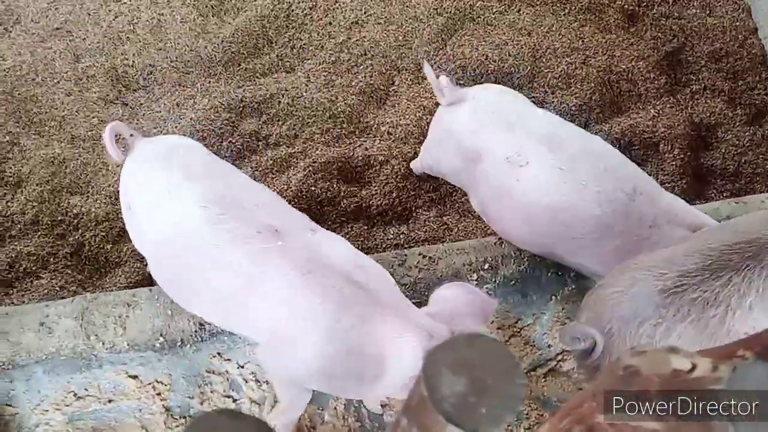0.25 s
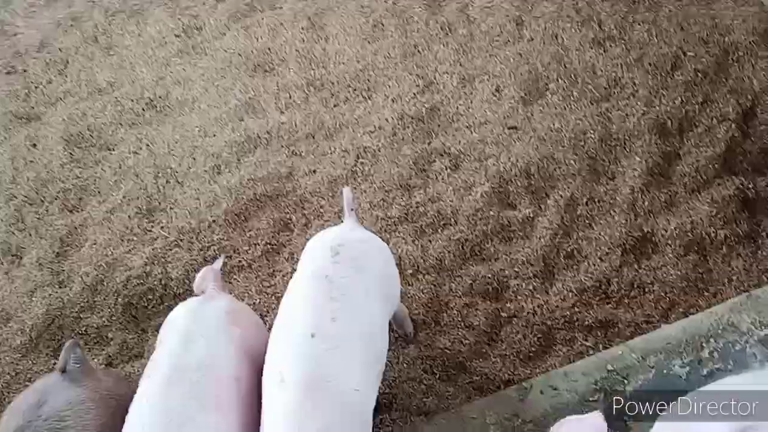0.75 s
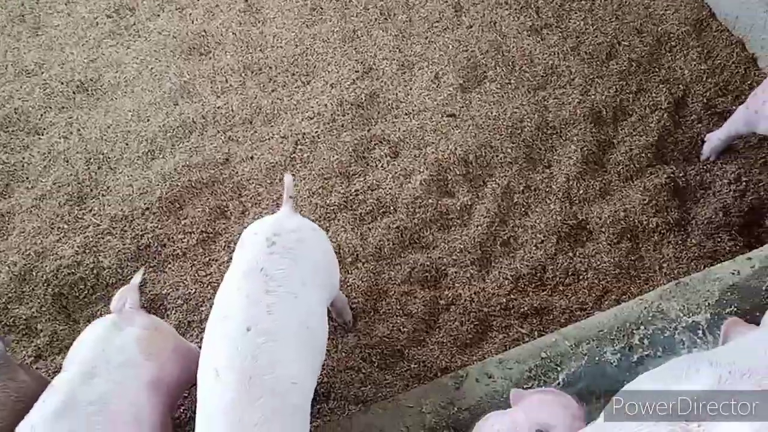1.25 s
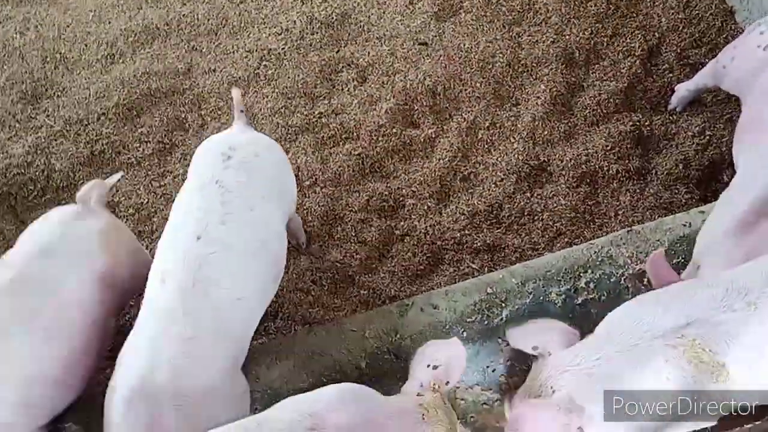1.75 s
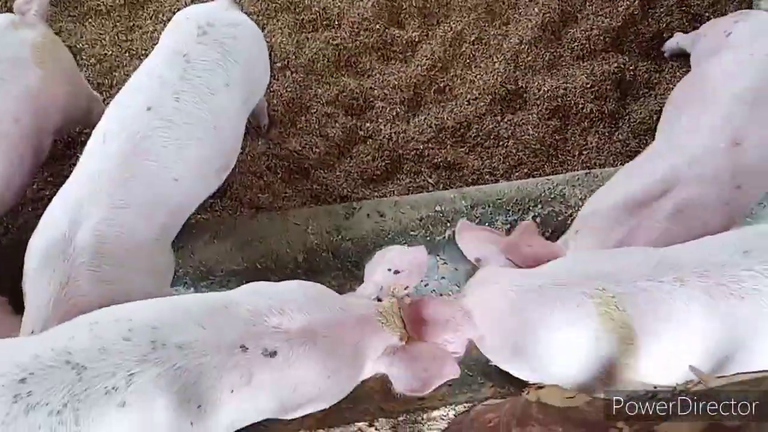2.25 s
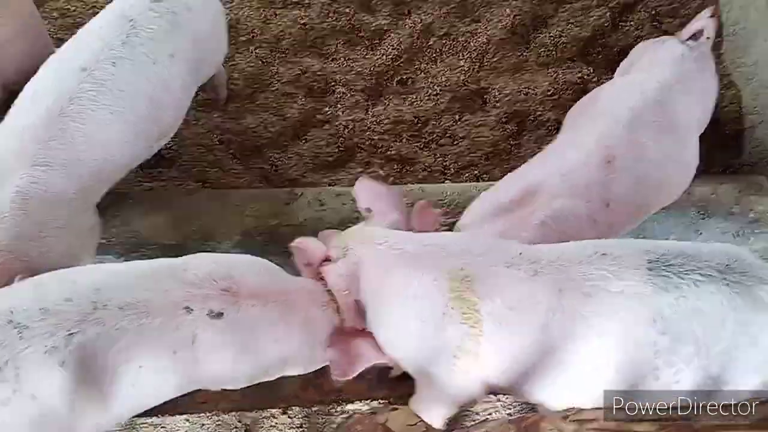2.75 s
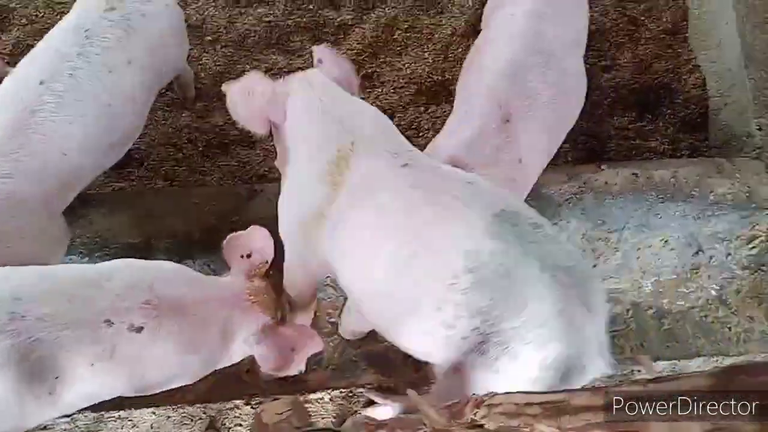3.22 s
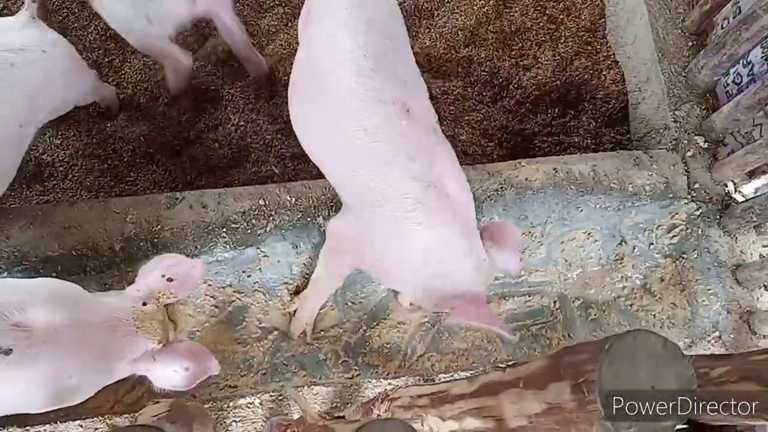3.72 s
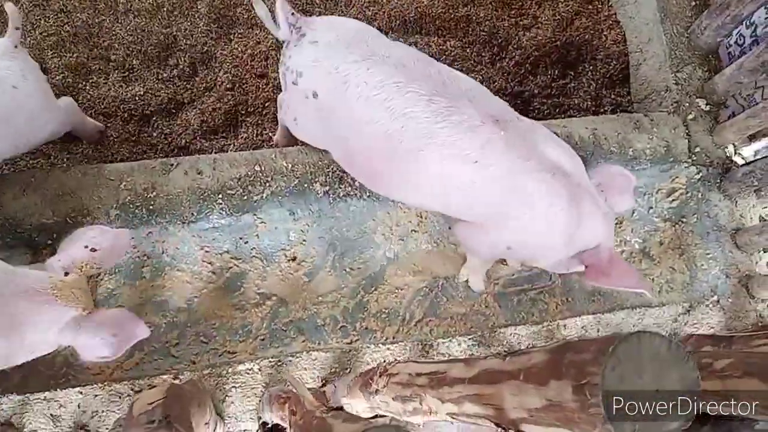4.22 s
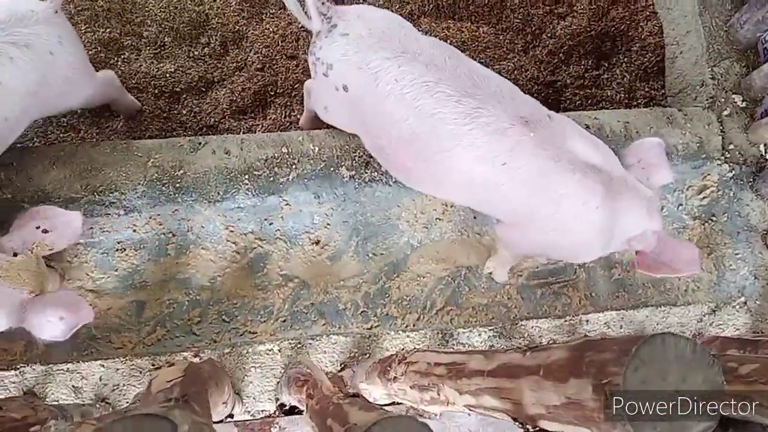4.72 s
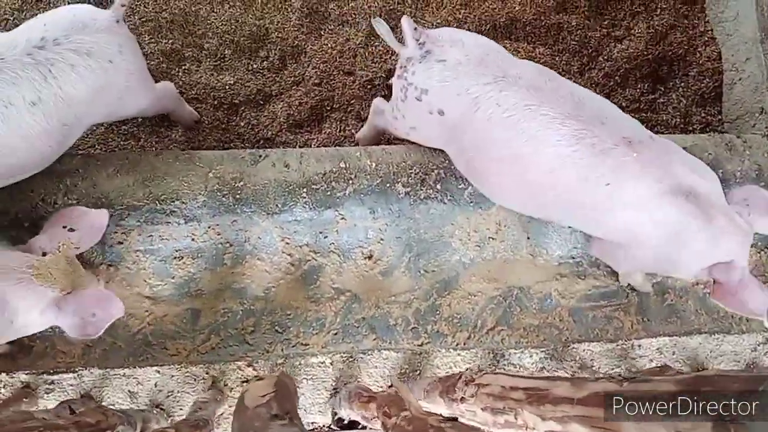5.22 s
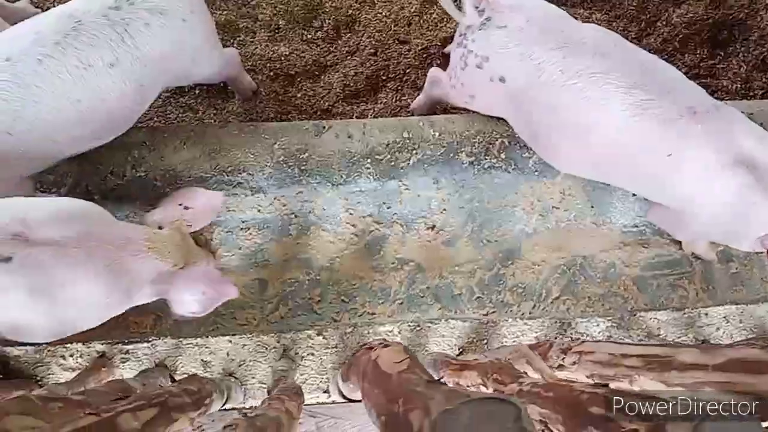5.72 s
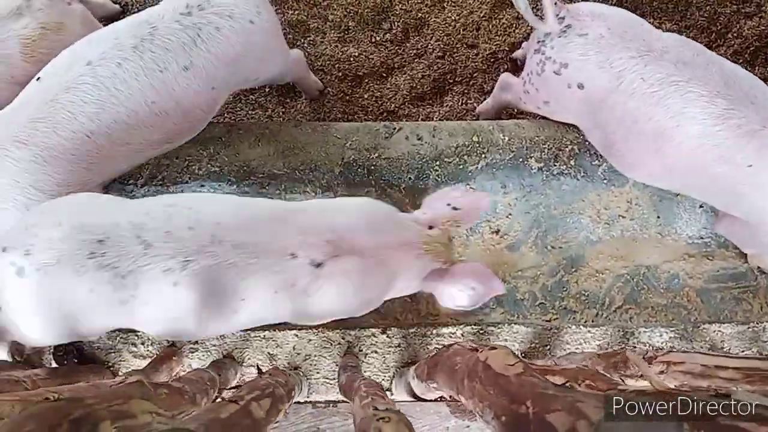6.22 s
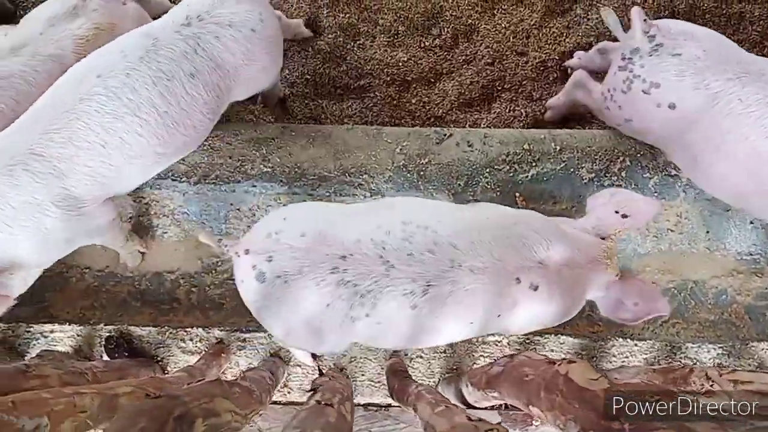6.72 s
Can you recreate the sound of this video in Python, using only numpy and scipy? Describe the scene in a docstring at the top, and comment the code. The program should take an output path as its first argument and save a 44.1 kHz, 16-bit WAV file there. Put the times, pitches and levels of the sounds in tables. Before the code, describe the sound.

Dense, messy pig chewing fills the whole stretch: sharp lip smacks, juicy slurps, crackling spit and low gulps, arriving irregularly from several mouths. The gulping thins briefly, then gathers again in the middle, while soft foot and snout thuds continue underneath. The sound is close, bright and mono, with tight reflections from a concrete pen; a tiny trio of bird chirps passes late.

```python
"""Piglets eat wet feed from a concrete trough, heard close from above through a mono phone microphone.
Lips and tongues smack, slurp and spit: noise bursts ring in mouth resonances. Throats gulp: sliding sine
notes with rasp. The herd's chewing is grainy noise, pops and ticks in flickering bands that swell and fade.
Thuds knock through the trough over a low, uneven rumble and a faint steady hiss; a bird gives three quick
chirps."""
import sys
import numpy as np
from scipy import signal
from scipy.fft import rfft, irfft, next_fast_len
from scipy.io import wavfile
from scipy.ndimage import uniform_filter1d

SR = 44100
rng = np.random.default_rng(int(sys.argv[2]) if len(sys.argv) > 2 else 0)


def materialize(psi):
    """Save the field psi as 16-bit PCM at rate SR to the path in sys.argv[1].

    A 1-D psi becomes a single channel; in a 2-D psi each row is a channel.
    """
    bounded = np.clip(np.atleast_2d(psi).T, -1, 1)
    quanta = np.round(bounded * 32767).astype(np.int16)
    wavfile.write(sys.argv[1], SR, quanta)


N = 307377

# herd's chewing, levels before flicker: t/s, grinding level/dB, mashing level/dB, squelch level/dB
CHEWING = [(0.0, -41, -48, -73), (0.09, -45, -51.5, -68), (0.14, -38, -54, -61), (0.25, -51.5, -48.5, -58),
           (0.34, -46.5, -59.5, -74), (0.41, -47, -47, -71), (0.5, -51.5, -56.5, -78),
           (0.63, -45.5, -50, -61), (0.67, -46.5, -63, -81), (0.74, -45, -47, -69), (0.81, -43.5, -61, -66),
           (0.88, -50.5, -55.5, -63.5), (0.97, -41, -49.5, -75), (1.03, -47.5, -64, -78.0),
           (1.08, -43.5, -52, -71), (1.13, -49, -62.5, -76), (1.29, -41, -46.5, -59), (1.37, -51, -58, -75),
           (1.53, -51, -53.5, -74.0), (1.59, -41, -52.5, -65), (1.71, -45.5, -58, -80),
           (1.75, -43, -60, -79), (1.79, -46.5, -54.5, -64), (1.89, -44, -56, -63), (1.96, -47, -49, -75),
           (2.01, -52.5, -67, -83), (2.07, -46, -55.5, -75), (2.14, -48, -54, -66),
           (2.27, -39.5, -54.5, -63.5), (2.5, -52, -54, -73), (2.56, -53.5, -70, -79.0),
           (2.62, -48.5, -56, -67), (2.74, -49.5, -59, -77), (2.83, -42, -46, -61),
           (2.89, -50.5, -57.5, -73), (2.97, -42.5, -52.5, -77), (3.15, -48, -51, -57),
           (3.22, -44.5, -58.0, -64), (3.35, -46, -50.5, -74), (3.46, -44, -55, -70),
           (3.67, -47.5, -51.5, -71), (3.77, -50.5, -59, -70), (3.84, -53.5, -57, -59),
           (3.89, -43, -55.5, -75), (4.01, -43, -54, -54), (4.11, -46, -54, -90), (4.19, -42.5, -48.5, -65),
           (4.3, -52, -62.5, -76), (4.39, -45.5, -54.5, -70), (4.44, -44.5, -53, -52),
           (4.56, -48, -59, -81), (4.6, -43.5, -46.5, -62), (4.65, -42.0, -53, -49.5),
           (4.83, -43.5, -51.5, -70.5), (5.01, -49.5, -58.5, -78), (5.14, -48.5, -54.5, -75),
           (5.2, -51.5, -55, -72), (5.36, -46.5, -53.5, -71), (5.42, -48, -54, -80),
           (5.62, -44.5, -51, -64), (5.92, -53, -59, -82), (6.0, -48.5, -52, -70.0), (6.1, -52, -64, -77),
           (6.15, -49.5, -54, -82), (6.24, -55, -67, -78.0), (6.31, -48.5, -47, -72),
           (6.38, -50.5, -65, -83), (6.56, -43.5, -49.5, -62.5), (6.63, -49, -52.5, -81),
           (6.77, -47, -53, -69), (6.84, -49.5, -52, -79), (6.97, -43.5, -54, -78.0)]
FIZZ_FROM_HZ = 7000


def undb(db):
    """Amplitude factor of a level in dB."""
    return 10 ** (np.asarray(db) / 20)


def unit(x):
    """Scale to RMS 1."""
    return x / np.sqrt(np.mean(x ** 2))


def band(x, hz, width_oct, order=1):
    """Butterworth band-pass around hz, edges kept between 20 Hz and 0.45 SR."""
    edges_hz = np.clip(hz * 2 ** (np.array([-.5, .5]) * width_oct), 20, .45 * SR)
    return signal.sosfilt(signal.butter(order, edges_hz, "bandpass", fs=SR, output="sos"), x)


def walk(rate_hz):
    """Random levels held 1 / rate_hz s, smoothed by two moving averages; RMS 1."""
    hold = int(SR / rate_hz)
    steps = np.repeat(rng.standard_normal(N // hold + 1), hold)
    return unit(uniform_filter1d(uniform_filter1d(steps, hold), hold)[:N])


def crackle(n, spread_db, grain_s):
    """Noise whose strength jumps from grain to grain, as wet films tear."""
    grain = max(int(grain_s * SR), 1)
    grain_db = spread_db * np.repeat(rng.standard_normal(n // grain + 1), grain)[:n]
    return rng.standard_normal(n) * undb(grain_db)


def fade(n, rise_s, t60_s):
    """Smooth rise times an exponential fall of 60 dB in t60_s (10 ms at least)."""
    t = np.arange(n) / SR
    return (1 - np.exp(-(t / rise_s) ** 2)) * np.exp(-np.log(1000) * t / max(t60_s, .01))


def add(out, start_s, sound, peak_db):
    """Mix a sound in at start_s, scaled to the given peak."""
    i = max(int(start_s * SR), 0)
    sound = sound[:N - i]
    out[i:i + len(sound)] += sound * undb(peak_db) / np.max(np.abs(sound))


def curves(table, t):
    """Each column of a curve table, interpolated at times t."""
    s, *columns = np.transpose(table)
    return [np.interp(t, s, c) for c in columns]


def scatter(per_s, column, re_db, spread_db, low_hz, octaves, t60_s):
    """Faint events at chance moments, louder where the chewing is: rows of t/s, peak/dB, f/Hz, t60/s."""
    when, size, pitch = rng.random((int(per_s * N / SR), 3)).T
    when_s = when * N / SR
    peak_db = curves(CHEWING, when_s)[column] + re_db - spread_db * np.log(size + 0.18)
    return [(s, db, low_hz * 2 ** (octaves * p), t60_s) for s, db, p in zip(when_s, peak_db, pitch)]


def coloured(points, flicker_db, rate_hz, noise):
    """Weight noise by f/Hz, level/dB points; cut third-octave bands, each flickering alone: (Hz, band) pairs."""
    treble_calm = 0.55  # share of the flicker kept by the fizz bands
    hz, db = np.transpose(points)
    size = next_fast_len(N)
    f = np.fft.rfftfreq(size, 1 / SR) + 1  # 1 Hz up, clear of log(0)
    spectrum = rfft(noise, size) * undb(np.interp(np.log(f), np.log(hz), db))
    bands = []
    for centre in hz[0] * 2 ** np.arange(0, np.log2(hz[-1] / hz[0]) + 1 / 3, 1 / 3):
        shape = np.cos(np.pi / 2 * np.clip(3 * np.log2(f / centre), -1, 1)) ** 2
        share = treble_calm if centre > FIZZ_FROM_HZ else 1
        flicker = undb(flicker_db * walk(rate_hz) * share)
        bands.append((centre, irfft(spectrum * shape, size)[:N] * flicker))
    return bands


def background_hiss():
    """A faint, steady mid-band background hiss, present throughout: band-passed noise."""
    return unit(band(rng.standard_normal(N), 1000, 1.9, order=2)) * undb(-78)


def rumble():
    """Shuffling bodies and far-off farm noise: low coloured noise in quick bumps."""
    # rumble spectrum: f/Hz, relative density/dB
    rumble_points = [(12, -50), (20, -11), (43, -25.5), (99, -7), (129, -1), (214, -7.5), (296, -19.5),
                     (400, -10), (520, -19), (880, -120)]
    bands = coloured(rumble_points, flicker_db=2.0, rate_hz=8, noise=rng.standard_normal(N))
    return unit(sum(b for hz, b in bands)) * undb(-68.5 + 3.9 * walk(25))


def bird():
    """A small bird some way off: each chirp is a pure tone sliding down about a fifth of its pitch."""
    # chirps: t/s, peak/dB
    chirp_rows = [(6.33, -41), (6.355, -36), (6.38, -38)]
    start_hz = 7550
    out, t = np.zeros(N), np.arange(int(.013 * SR)) / SR
    for s, db in chirp_rows:
        tone = np.sin(2 * np.pi * start_hz * (t - 7.9 * t ** 2))
        add(out, s, tone * np.hanning(len(t)), db)
    return out


def thuds():
    """Feet and snouts on the trough: dull, short noise knocks carried through concrete and rails."""
    # thuds, begun 8 ms ahead: t/s, peak/dB
    thud_rows = [(0.269, -54), (0.416, -60), (0.736, -51), (0.879, -56), (1.041, -57), (1.215, -49),
                 (1.276, -56), (1.436, -56), (1.511, -53), (1.661, -59), (1.834, -59), (1.918, -51),
                 (2.138, -51), (2.219, -48.5), (2.399, -53), (2.527, -54), (2.617, -52), (2.702, -52),
                 (2.913, -50), (2.988, -54), (3.084, -54), (3.302, -54), (3.578, -51), (3.853, -48),
                 (3.98, -47.5), (4.163, -50), (4.419, -48), (4.569, -53), (4.868, -68), (5.197, -70),
                 (5.368, -53), (5.636, -63), (5.762, -57), (5.957, -52), (6.071, -60), (6.364, -55),
                 (6.453, -57), (6.539, -51.5), (6.66, -51), (6.753, -60), (6.855, -50)]
    centre_hz, scatter_share = 115.3, 0.072
    out, n = np.zeros(N), int(.25 * SR)
    for s, db in thud_rows:
        push = rng.standard_normal(n) * fade(n, 0.008, 0.11)
        hz = centre_hz * (1 + scatter_share * rng.standard_normal())
        knock = band(push, hz, 0.54, order=2) + 0.25 * band(push, 86, 0.76, order=2)
        add(out, s - .008, knock, db)
    return out


def pops(rate_per_s, spread_db, t60_s):
    """Tiny air pockets bursting in the mash, each a short ring at its own pitch."""
    slots_per_s, n = 2000, 1024
    out = np.zeros(N + n)
    t = np.arange(n) / SR
    for slot, (keep, pitch, size) in enumerate(rng.random((N * slots_per_s // SR, 3))):
        if keep < rate_per_s / slots_per_s:
            hz = 1000 + 14500 * pitch ** 1.6
            ring = np.sin(2 * np.pi * hz * t) * fade(n, 0.00046, t60_s)
            i = slot * SR // slots_per_s
            out[i:i + n] += ring * undb(-spread_db * np.log(size + .03))
    return unit(out[:N])


def ticks(rate_per_s, spread_db, t60_s):
    """Wet films snapping: sparse clicks, each a very short wideband noise tail."""
    keep, size = rng.random((N, 2)).T
    snaps = (keep < rate_per_s / SR) * undb(-spread_db * np.log(size + .1))
    return unit(signal.fftconvolve(snaps, fade(512, 0.00017, t60_s))[:N] * rng.standard_normal(N))


def herd():
    """Many jaws at once: grinding, mashing, squelch, fizz and throat murmur swell bite by bite."""
    # chewing spectrum: f/Hz, relative density/dB
    chew_points = [(650, -63), (1100, -29), (1240, -48), (1550, -15), (1900, -2.5), (2530, -0.5),
                   (3230, -1.5), (4600, 3.5), (7420, -1.5), (8660, 5.5), (9680, 2), (11700, -9),
                   (14600, -8.5), (15600, -11)]
    # murmur and squelch spectrum: f/Hz, relative density/dB
    murmur_points = [(180, -55), (300, -58), (470, -6), (648, -17.5), (751, -5), (1070, -12), (1220, -15),
                     (1400, -8.5), (1600, -38), (2080, -23), (3520, -120)]
    # wet fizz, by band centre: t/s, 7-9.1 kHz level/dB, 9.1-11.5 kHz level/dB, level above/dB
    fizz_rows = [(0.0, -44.5, -50, -54), (0.41, -48, -53.5, -53), (0.56, -48, -55, -52),
                 (0.76, -46, -54.5, -51), (1.12, -53, -47.5, -48.5), (1.4, -51, -55, -49.5),
                 (1.57, -50, -48, -49), (1.71, -50.5, -51.5, -49), (2.74, -49.5, -50, -51.5),
                 (3.14, -48, -48, -49), (3.94, -48.5, -47.5, -49), (4.1, -46, -41.5, -43.5),
                 (4.39, -48.5, -48, -47), (4.72, -47, -45.5, -48.5), (5.05, -48, -51, -51.5),
                 (5.49, -49, -51, -51), (5.9, -48, -52, -50.5), (6.19, -47.5, -52, -50),
                 (6.5, -49.5, -51, -50.5), (6.97, -46.5, -44, -47.5)]
    # throat murmur: t/s, level/dB
    throat_rows = [(0.0, -66), (0.09, -56), (0.15, -58), (0.27, -67), (0.35, -81), (0.43, -87), (0.64, -74),
                   (0.79, -61.5), (0.99, -72), (1.16, -77), (1.3, -59), (1.44, -82), (1.65, -59),
                   (1.76, -82), (1.8, -65), (1.94, -77), (2.33, -71), (2.39, -87), (2.52, -62.5),
                   (2.58, -72), (2.72, -71), (2.81, -55), (2.93, -67), (3.11, -71), (3.22, -55),
                   (3.42, -70), (3.63, -65), (3.76, -74), (3.9, -70), (4.04, -61), (4.12, -64), (4.25, -76),
                   (4.41, -65), (4.44, -73), (4.56, -69), (4.6, -54.5), (4.76, -72), (4.85, -58),
                   (4.99, -70.5), (5.16, -75), (5.38, -67), (5.47, -65), (5.82, -77), (6.56, -70.5),
                   (6.97, -64.5)]
    squelch_from_hz, grind_from_hz, upper_from_hz, top_from_hz = 620, 3000, 9100, 11500

    t = np.arange(N) / SR
    grind_db, mash_db, squelch_db = curves(CHEWING, t)
    fizz_db, upper_db, top_db = curves(fizz_rows, t)
    murmur_db, = curves(throat_rows, t)

    mush = crackle(N, spread_db=1.5, grain_s=0.0099)
    mush = mush + undb(-7.5) * pops(rate_per_s=1200, spread_db=5.0, t60_s=0.024)
    mush = mush + undb(-8.5) * ticks(rate_per_s=110, spread_db=3.5, t60_s=0.007)
    bands = coloured(chew_points, flicker_db=2.0, rate_hz=30, noise=mush)

    # wider-open mouths let the sound reach lower: the lowest bands swell most
    opening_db = 0.7 * (mash_db - mash_db.mean()) + 3.6 * walk(14)  # per octave below grind_from_hz
    mash = unit(sum(b * undb(opening_db * np.log2(grind_from_hz / hz))
                    for hz, b in bands if hz < grind_from_hz))
    grind = unit(sum(b for hz, b in bands if grind_from_hz <= hz < FIZZ_FROM_HZ))
    fizz = unit(sum(b for hz, b in bands if FIZZ_FROM_HZ <= hz < upper_from_hz))
    upper = unit(sum(b for hz, b in bands if upper_from_hz <= hz < top_from_hz))
    top = unit(sum(b for hz, b in bands if hz >= top_from_hz))

    throat_noise = crackle(N, spread_db=3.0, grain_s=0.0059)
    low = coloured(murmur_points, flicker_db=7.0, rate_hz=35, noise=throat_noise)
    murmur = unit(sum(b for hz, b in low if hz < squelch_from_hz))
    squelch = unit(sum(b for hz, b in low if hz >= squelch_from_hz))

    teeth = (mash * undb(mash_db) + grind * undb(grind_db)) * undb(1.0 * walk(25))
    hiss = fizz * undb(fizz_db) + upper * undb(upper_db) + top * undb(top_db)
    return teeth + hiss + murmur * undb(murmur_db) + squelch * undb(squelch_db)


def gulps():
    """A pocket of air in the throat: a soft push and a little noise ring one hollow, sliding note."""
    # gulps, begun 5 ms ahead: t/s, peak/dB, throat note f/Hz, t60/s
    gulp_rows = [(0.059, -37.5, 508, 0.099), (0.134, -44.5, 534, 0.076), (0.215, -47, 550, 0.09),
                 (0.24, -37, 494, 0.18), (0.273, -38, 477, 0.024), (0.393, -48, 492, 0.17),
                 (1.245, -42.5, 464, 0.13), (1.291, -43, 442, 0.057), (1.392, -49.5, 466, 0.11),
                 (1.458, -52, 597, 0.057), (1.524, -33, 458, 0.033), (1.558, -43, 526, 0.069),
                 (1.612, -44.5, 576, 0.12), (1.734, -55, 590, 0.04), (1.795, -55, 513, 0.1),
                 (1.815, -44.5, 486, 0.11), (1.845, -50.5, 557, 0.12), (2.225, -51, 474, 0.12),
                 (2.32, -53, 642, 0.12), (2.36, -54, 630, 0.078), (1.873, -46.5, 591, 0.15),
                 (1.913, -44, 454, 0.063), (1.964, -45, 554, 0.09), (1.983, -43, 484, 0.11),
                 (2.168, -55, 460, 0.3), (2.254, -40, 417, 0.19), (2.294, -38.5, 510, 0.06),
                 (2.542, -41.5, 483, 0.073), (2.679, -50.5, 472, 0.18), (2.771, -52, 482, 0.16),
                 (2.791, -47, 458, 0.053), (2.84, -46, 442, 0.11), (3.036, -38.5, 462, 0.026),
                 (3.091, -43.5, 483, 0.046), (3.149, -46, 560, 0.078), (3.171, -45, 450, 0.044),
                 (3.192, -46, 491, 0.14), (3.238, -37.5, 418, 0.059), (3.215, -41, 507, 0.051),
                 (3.286, -51, 486, 0.054), (3.303, -47, 460, 0.05), (3.33, -45.5, 495, 0.16),
                 (3.52, -51, 458, 0.08), (3.612, -49.5, 480, 0.043), (3.8, -47, 479, 0.039),
                 (2.895, -49, 486, 0.06), (3.404, -48.5, 466, 0.041), (3.485, -50.5, 432, 0.12),
                 (3.558, -40, 480, 0.039), (3.683, -39, 482, 0.069), (3.711, -44.5, 458, 0.03),
                 (3.779, -47, 476, 0.088), (3.913, -50, 470, 0.21), (3.971, -37.5, 503, 0.076),
                 (4.032, -51, 477, 0.082), (4.089, -41, 485, 0.073), (4.125, -43.5, 502, 0.26),
                 (4.17, -45.5, 560, 0.14), (4.197, -37, 505, 0.092), (4.301, -53, 463, 0.066),
                 (4.407, -37, 494, 0.094), (4.452, -39, 493, 0.11), (4.495, -37.5, 493, 0.029),
                 (4.531, -39, 456, 0.06), (4.58, -46, 486, 0.09), (4.634, -38, 482, 0.13),
                 (4.667, -36.5, 490, 0.12), (4.731, -41, 477, 0.095), (5.17, -36.5, 485, 0.029),
                 (5.325, -44.5, 486, 0.1), (5.424, -44.5, 494, 0.18), (5.497, -49, 450, 0.066),
                 (5.53, -47, 498, 0.09), (5.64, -41, 484, 0.033), (6.016, -52, 441, 0.14),
                 (6.034, -40, 462, 0.077), (6.123, -38.5, 474, 0.066), (6.145, -45, 513, 0.044),
                 (6.317, -43.5, 454, 0.025), (6.41, -55, 475, 0.13), (6.45, -51, 510, 0.039),
                 (6.522, -50, 470, 0.19)]
    glide_per_s = 2.2  # spread of the slide, share of the pitch per second
    out, n = np.zeros(N), int(.3 * SR)
    t = np.arange(n) / SR
    for s, db, hz, t60_s in gulp_rows:
        glide = glide_per_s * rng.standard_normal()
        note = np.sin(2 * np.pi * hz * (t + glide * t ** 2 / 2))
        rasp = unit(band(rng.standard_normal(n), hz, 0.34, order=2))
        add(out, s - .005, (note + 0.52 * rasp) * fade(n, 0.0066, t60_s), db)
    return out


def spits():
    """Fine spray as lips part: short sharp crackling hisses in wide treble bands."""
    # spits: t/s, peak/dB, t60/s
    spit_rows = [(0.059, -24, 0.055), (0.15, -25, 0.06), (0.5374, -36, 0.044), (0.6024, -31, 0.075),
                 (0.6988, -25, 0.11), (0.7911, -25, 0.055), (1.074, -20.5, 0.084), (1.475, -23, 0.049),
                 (1.735, -22, 0.07), (1.8243, -25, 0.12), (2.2638, -18, 0.056), (2.4114, -28, 0.06),
                 (2.6195, -23.5, 0.059), (2.6309, -25, 0.06), (2.8386, -23, 0.053), (2.982, -23, 0.06),
                 (3.2047, -24, 0.067), (3.3624, -25, 0.06), (3.555, -17, 0.03), (3.6157, -24, 0.04),
                 (3.6631, -23, 0.06), (3.684, -17, 0.098), (4.1924, -41, 0.055), (4.4017, -23, 0.06),
                 (4.8347, -28, 0.045), (5.0469, -25.5, 0.076), (5.1515, -27.5, 0.04), (5.2924, -24, 0.025),
                 (5.5503, -25, 0.12), (5.666, -30, 0.055), (5.7206, -37, 0.07), (5.7852, -37, 0.06),
                 (5.9693, -17.5, 0.07), (6.124, -26, 0.047), (6.1948, -26, 0.035), (6.5156, -25, 0.14),
                 (6.5331, -21, 0.057), (6.6865, -26.5, 0.043), (6.774, -15.5, 0.077), (6.9386, -34, 0.053)]
    out, n = np.zeros(N), int(.1 * SR)
    for s, db, t60_s in spit_rows:
        hiss = crackle(n, spread_db=6.0, grain_s=0.00033) * fade(n, 0.00029, t60_s)
        spray = band(hiss, 10000, 0.48, order=2)
        spray = spray + 0.64 * band(hiss, 11840, 1.0, order=2)
        spray = spray + 0.076 * band(hiss, 4200, 1.5, order=1)
        add(out, s, spray, db)
    return out


def sips():
    """Faint slurps between the clear ones, their peaks following the squelch level."""
    return scatter(per_s=12, column=2, re_db=9, spread_db=4, low_hz=629, octaves=1.39, t60_s=0.038)


def slurps():
    """Liquid drawn in over the tongue: snap and ragged noise in a low mouth resonance, and a rising bubble."""
    # slurps through a wide-open jaw, begun 1.5 ms ahead: t/s, peak/dB, resonance f/Hz, t60/s
    slurp_rows = [(0.039, -41, 1550, 0.056), (0.086, -39.5, 650, 0.052), (0.207, -34, 794, 0.13),
                  (0.605, -48, 1020, 0.13), (0.626, -43.5, 795, 0.092), (0.706, -45, 800, 0.042),
                  (0.745, -47, 900, 0.083), (1.079, -46, 1310, 0.082), (1.162, -52, 850, 0.096),
                  (1.288, -45, 990, 0.099), (1.306, -38, 780, 0.073), (1.438, -50, 1670, 0.03),
                  (1.461, -28, 1240, 0.02), (1.567, -49, 725, 0.075), (1.61, -34.5, 756, 0.039),
                  (1.733, -32.5, 1380, 0.076), (1.735, -36, 750, 0.05), (1.63, -55, 630, 0.13),
                  (1.797, -42, 1270, 0.091), (1.945, -43.5, 803, 0.094), (2.141, -42, 1200, 0.36),
                  (2.255, -36, 1100, 0.11), (2.266, -25.5, 1310, 0.023), (2.84, -36, 1320, 0.15),
                  (3.164, -39, 1330, 0.075), (3.237, -32, 1460, 0.09), (3.31, -41, 1550, 0.081),
                  (3.525, -35, 1460, 0.1), (3.673, -46, 1400, 0.085), (3.799, -34.5, 1780, 0.055),
                  (3.97, -32, 734, 0.034), (4.146, -42, 1560, 0.034), (4.172, -37, 1540, 0.048),
                  (4.193, -33.5, 796, 0.062), (4.408, -44, 630, 0.13), (4.413, -43, 688, 0.27),
                  (4.577, -33.5, 955, 0.12), (4.636, -22, 1450, 0.044), (4.833, -37.5, 1540, 0.16),
                  (5.156, -51, 1510, 0.048), (5.168, -33, 760, 0.039), (5.347, -46, 1570, 0.073),
                  (5.423, -42, 1640, 0.054), (5.455, -48, 1400, 0.083), (5.665, -45, 1550, 0.067),
                  (5.783, -35, 1487, 0.062), (5.949, -43, 1480, 0.092), (6.0199, -23.5, 1840, 0.065),
                  (5.995, -50, 855, 0.051), (6.129, -49.5, 746, 0.16), (2.686, -46, 740, 0.047),
                  (1.517, -47, 905, 0.042), (3.626, -52, 950, 0.056), (2.346, -52, 700, 0.073),
                  (2.744, -52, 980, 0.12), (6.279, -47, 1620, 0.069), (6.775, -36.5, 1360, 0.053)]
    bubble_db, bubble_rise_per_s = -10.5, 4  # closing air pocket; rise as a share of its pitch
    out, n = np.zeros(N), int(.2 * SR)
    t = np.arange(n) / SR
    for s, db, hz, t60_s in list(slurp_rows) + sips():
        burst = crackle(n, spread_db=5.0, grain_s=0.003) * fade(n, 0.00064, t60_s)
        burst[int(.001 * SR)] += 14  # snap
        tone = np.sin(2 * np.pi * hz * (t + bubble_rise_per_s * t ** 2 / 2))
        bubble = unit(tone * fade(n, 0.006, t60_s))
        mouth = unit(band(burst, hz, 0.22, order=2)) + 0.9 * unit(band(burst, 1.3 * hz, 1.3, order=2))
        add(out, s - .0015, mouth + undb(bubble_db) * bubble, db)
    return out


def nibbles():
    """The many faint smacks between the clear ones, their peaks following the grinding level."""
    return scatter(per_s=22, column=0, re_db=4.5, spread_db=4, low_hz=1797, octaves=1.75, t60_s=0.03)


def smacks():
    """Each tearing burst rings the mouth at its own pitch and four chance ones, with spray and treble."""
    # smacks: t/s, peak without treble/dB, mouth resonance f/Hz, t60/s
    smack_rows = [(0.056, -22.5, 5800, 0.05), (0.119, -36, 4000, 0.22), (0.149, -23.5, 2510, 0.048),
                  (0.2091, -31.5, 3580, 0.099), (0.306, -35.5, 3120, 0.089), (0.382, -31, 5470, 0.57),
                  (0.5327, -32, 2310, 0.042), (0.547, -31.5, 3400, 0.043), (0.6, -32, 5500, 0.088),
                  (0.7438, -36, 3330, 0.16), (0.7824, -29.5, 3750, 0.27), (0.8283, -29.5, 3060, 0.036),
                  (0.8988, -31, 3440, 0.13), (0.987, -32.5, 3050, 0.068), (1.062, -34, 3680, 0.1),
                  (1.085, -25, 5300, 0.04), (1.267, -26.5, 4670, 0.22), (1.4573, -38, 2660, 0.08),
                  (1.475, -31.5, 2980, 0.041), (1.557, -35.5, 3340, 0.087), (1.582, -25, 2630, 0.032),
                  (1.7327, -19, 4340, 0.065), (1.74, -23, 2580, 0.052), (1.762, -33, 5400, 0.04),
                  (1.8234, -31.5, 2640, 0.1), (1.8627, -29, 4900, 0.22), (2.029, -38, 3800, 0.065),
                  (2.0687, -27, 4900, 0.025), (2.0755, -24.5, 4500, 0.044), (2.251, -31.5, 2700, 0.15),
                  (2.2634, -28, 2030, 0.047), (2.403, -32, 4470, 0.11), (2.4838, -29.5, 3360, 0.038),
                  (2.5067, -34.5, 4500, 0.051), (2.6193, -31, 6340, 0.2), (2.621, -28, 7000, 0.015),
                  (2.84, -28, 4500, 0.014), (2.798, -40, 2700, 0.076), (2.814, -32, 3100, 0.06),
                  (2.8395, -23.5, 4580, 0.056), (2.9693, -30.5, 4140, 0.11), (3.039, -27.5, 4000, 0.063),
                  (3.091, -29.5, 4460, 0.025), (3.0985, -32, 4500, 0.017), (3.1065, -39, 4500, 0.015),
                  (3.125, -30, 3070, 0.059), (3.163, -30, 2560, 0.03), (3.1703, -23.5, 4650, 0.045),
                  (3.243, -31, 2850, 0.039), (3.274, -24.5, 4430, 0.025), (3.323, -30, 5310, 0.092),
                  (3.343, -30.5, 4500, 0.15), (3.3998, -25.5, 1860, 0.044), (3.526, -25.5, 4250, 0.066),
                  (3.375, -33, 2640, 0.028), (3.6163, -28.5, 2600, 0.08), (3.676, -21.5, 5370, 0.052),
                  (3.684, -19, 4120, 0.036), (3.8477, -27, 2500, 0.028), (3.8847, -28.5, 2920, 0.039),
                  (3.972, -27, 1940, 0.023), (4.005, -33, 4130, 0.12), (4.018, -27, 2660, 0.046),
                  (4.051, -32, 2470, 0.03), (4.165, -26, 2790, 0.077), (4.1902, -18.5, 2980, 0.034),
                  (4.196, -20, 3910, 0.053), (4.351, -31, 4400, 0.055), (4.5106, -28.5, 4000, 0.03),
                  (4.587, -33, 1820, 0.056), (4.636, -22.5, 3150, 0.021), (4.427, -37.5, 2230, 0.054),
                  (4.656, -27, 2660, 0.085), (4.7824, -32, 2710, 0.054), (4.82, -35, 4720, 0.089),
                  (4.8357, -33, 4180, 0.052), (4.836, -28.5, 3540, 0.019), (4.971, -32, 2670, 0.038),
                  (5.1127, -26, 2240, 0.026), (5.152, -32, 4300, 0.082), (5.455, -42, 4280, 0.073),
                  (5.493, -32, 4430, 0.042), (5.551, -28.5, 2970, 0.056), (5.5843, -34, 2560, 0.11),
                  (5.667, -30.5, 4770, 0.023), (5.725, -19.5, 4310, 0.033), (5.787, -23.5, 4150, 0.044),
                  (5.958, -31, 2520, 0.12), (5.971, -24.5, 3780, 0.06), (6.019, -24.5, 2400, 0.025),
                  (6.031, -41, 2300, 0.13), (5.877, -37, 3370, 0.038), (6.126, -36.5, 1960, 0.25),
                  (6.1577, -25.5, 4260, 0.038), (6.223, -34, 4330, 0.063), (6.276, -25, 4200, 0.065),
                  (6.309, -35, 2570, 0.064), (6.344, -32, 2390, 0.04), (6.396, -30.5, 4430, 0.22),
                  (6.533, -32, 4600, 0.28), (6.662, -30.5, 2470, 0.091), (6.775, -22.5, 4170, 0.052),
                  (6.925, -36, 2380, 0.027), (6.939, -25, 5100, 0.081)]
    cavity_spread_oct, treble_db = 0.496, -8  # treble peak re the smack's
    out, n = np.zeros(N), int(.2 * SR)
    for s, db, hz, t60_s in list(smack_rows) + nibbles():
        burst = crackle(n, spread_db=2.0, grain_s=0.0015) * fade(n, 0.0012, t60_s)
        burst[int(.001 * SR)] += 5.0  # the seal between lips and tongue snaps
        mouth = unit(band(burst, hz, 0.21, order=2))
        cavity_hz = np.clip(hz * 2 ** (cavity_spread_oct * rng.standard_normal(size=4)), 1500, 8000)
        cavities = unit(sum(band(burst, f, 0.084, order=2) for f in cavity_hz))
        spray = unit(band(burst, np.sqrt(hz * 3000), 0.96, order=2))
        add(out, s, mouth + undb(-4.5) * cavities + undb(0.5) * spray, db)
        treble = band(burst, 9550, 0.13, order=2) + 0.18 * band(burst, 12500, 0.12, order=2)
        add(out, s, treble, db + treble_db)
    return out


def scene():
    """Near sounds with their echoes over the herd and background, the same in both channels."""
    near = smacks() + slurps() + spits() + gulps() + thuds() + bird()
    # the trough floor and the pen wall return quick, weaker copies (the end wraps to the start)
    echo_taps = [(.0013, 0.17), (.0047, 0.17), (.011, 0.25)]  # lag/s, gain
    echoes = sum(gain * np.roll(near, int(lag_s * SR)) for lag_s, gain in echo_taps)
    return np.tile(near + echoes + herd() + rumble() + background_hiss(), (2, 1))


def record(dry):
    """The phone cuts the top: a steep elliptic low-pass."""
    top_hz = 15520
    return signal.sosfilt(signal.ellip(12, .2, 70, top_hz, fs=SR, output="sos"), dry)


dry = scene()
out = record(dry)
materialize(out)
```